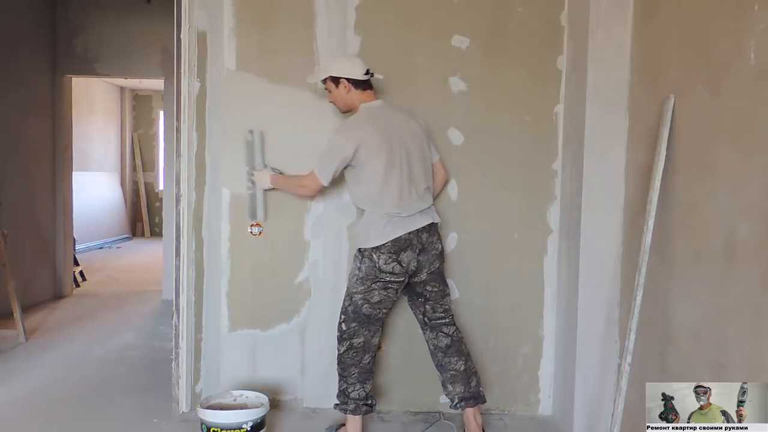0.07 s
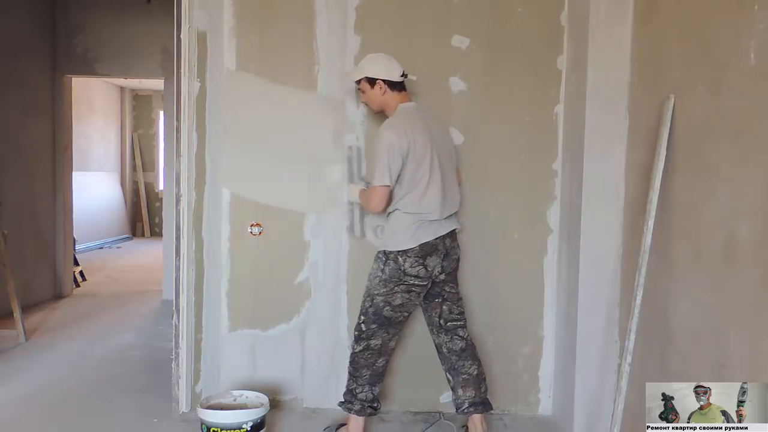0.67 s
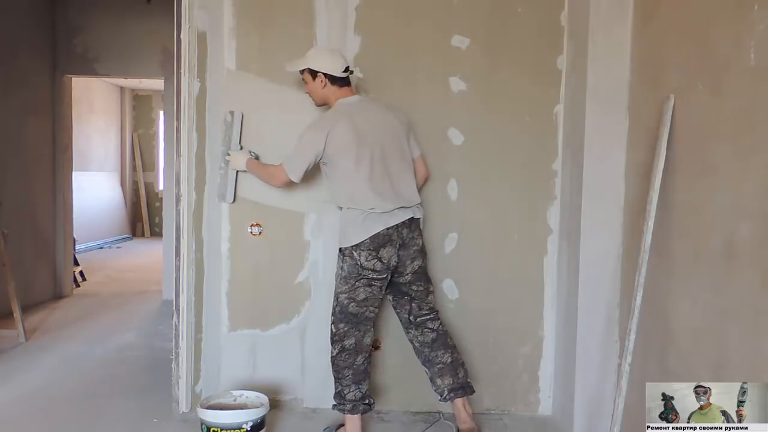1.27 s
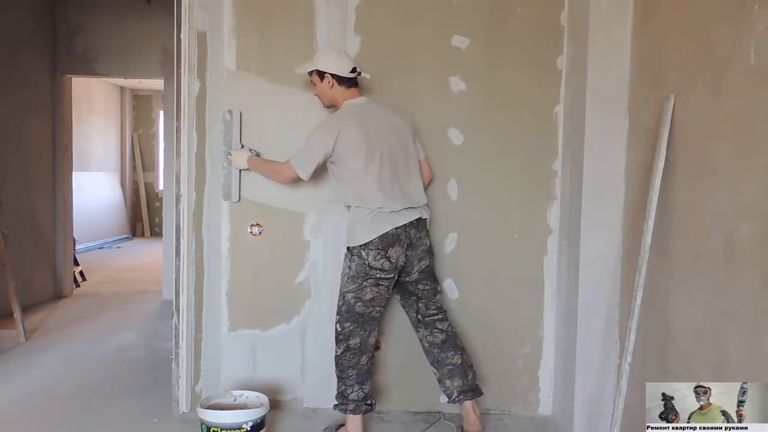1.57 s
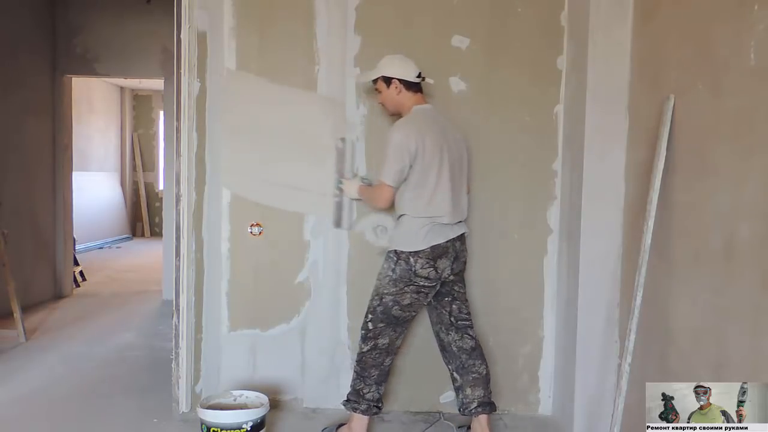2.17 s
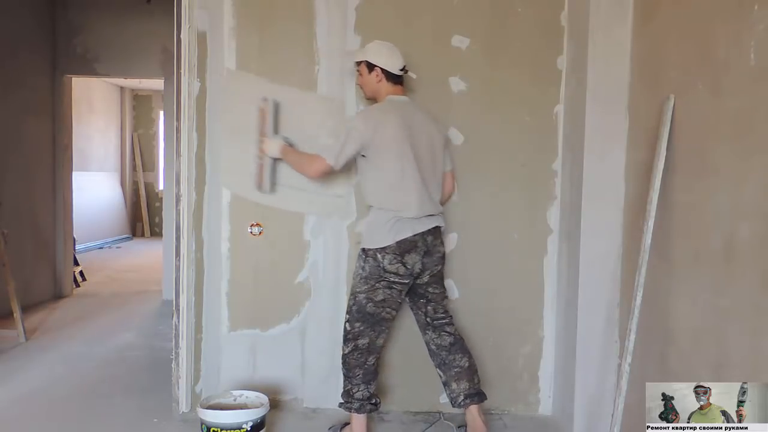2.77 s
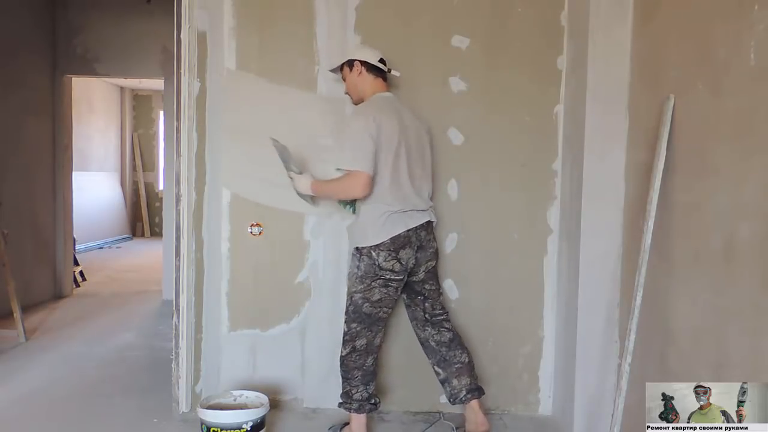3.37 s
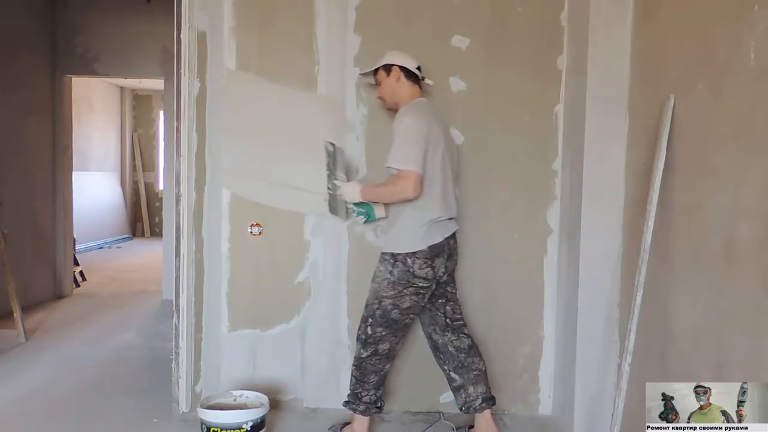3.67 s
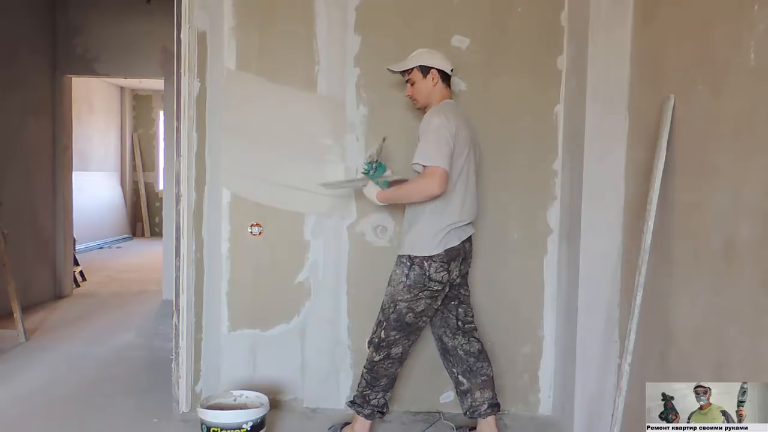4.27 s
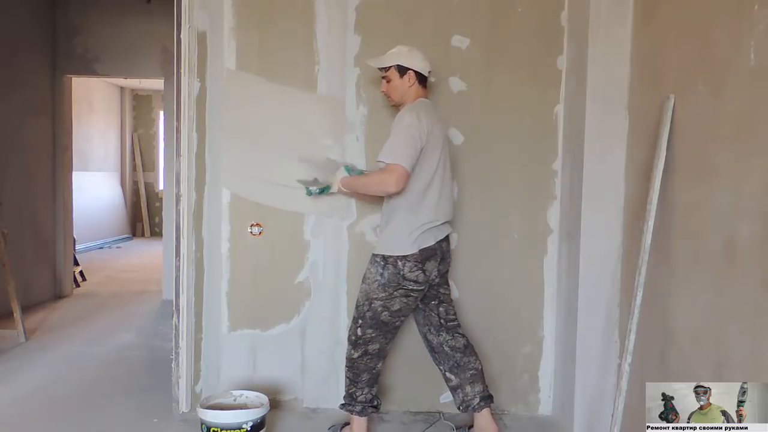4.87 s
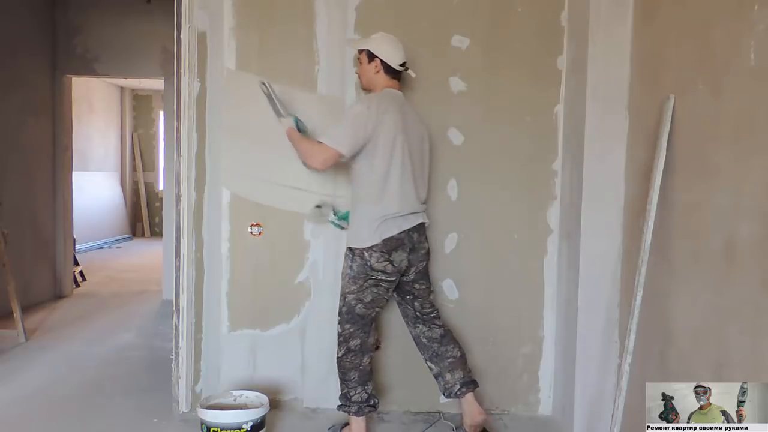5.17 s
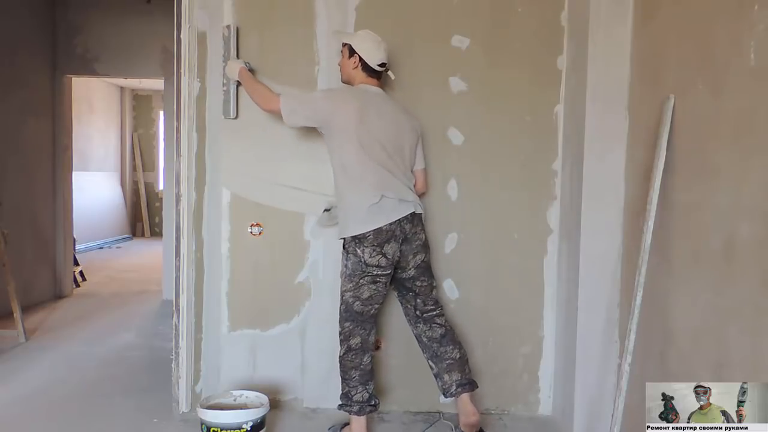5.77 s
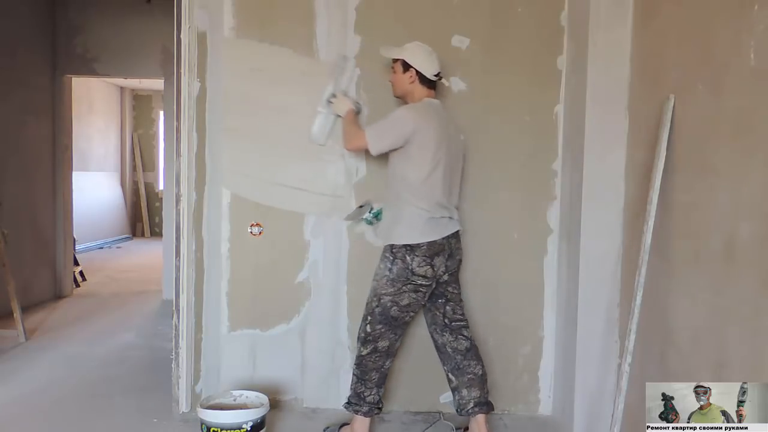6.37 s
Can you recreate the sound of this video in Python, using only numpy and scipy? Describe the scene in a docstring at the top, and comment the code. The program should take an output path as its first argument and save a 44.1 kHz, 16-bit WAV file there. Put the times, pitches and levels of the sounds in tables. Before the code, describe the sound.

Gritty trowel strokes spread hissing wet plaster on a wall in a bare, echoing room, broken by a putty knife wiping the blade.

```python
"""Plastering a wall

A wide steel trowel skims a wall in a bare, echoing room: two long strokes and the start of a third.
Grit grinds under the edge, the blade judders and drums on the wall, wet plaster hisses as it spreads.
In between, a putty knife wipes the blade clean and reloads it, and the trowel is set back
with a soft thud."""
import sys
import numpy as np
from scipy import signal
from scipy.fft import rfft, irfft, next_fast_len
from scipy.io import wavfile
from scipy.ndimage import uniform_filter1d, map_coordinates

SR = 44100
rng = np.random.default_rng(int(sys.argv[2]) if len(sys.argv) > 2 else 0)


def digitize_waveform(pressure):
    """Quantize a signal to 16-bit integers and store it at the path in sys.argv[1].

    Rows of a 2-D input are taken as channels; values are limited to [-1, 1].
    """
    field = np.atleast_2d(pressure).T
    bounded = np.clip(field, -1, 1)
    quanta = np.round(bounded * 32767).astype(np.int16)
    wavfile.write(sys.argv[1], SR, quanta)


N = 292383
T = np.arange(N) / SR


def amp(db):
    """Turn decibels into a number to multiply by."""
    return 10 ** (np.asarray(db) / 20)


def unit(x):
    """Scale a signal to an average strength (rms) of 1."""
    return x / np.sqrt(np.mean(x ** 2) + 1e-20)


def along(points, hz):
    """Read between rows of (frequency, value), giving each octave equal space."""
    freqs, values = np.transpose(points)
    return np.interp(np.log(hz + 1), np.log(freqs + 1), values)


def filtered(x, response):
    """Multiply each frequency in x by response(frequency)."""
    size = x.shape[-1]
    padded = next_fast_len(size + SR // 4)
    hz = np.fft.rfftfreq(padded, 1 / SR)
    return irfft(rfft(x, padded) * response(hz), padded)[..., :size]


def colour(x, spectrum):
    """Shape the tone of x with rows of (frequency in Hz, level in dB)."""
    return filtered(x, lambda hz: amp(along(spectrum, hz)))


def wobble(rate):
    """A smooth curve through `rate` random values a second."""
    return map_coordinates(rng.standard_normal(int(N * rate / SR) + 4), [T * rate])


def swell(start, length, shape=0.51):
    """A rounded rise and fall; a higher shape eases in and out more gently."""
    progress = np.clip((T - start) / length, 0, 1)
    return (4 * progress * (1 - progress)) ** shape


def held(start, length, attack_s, release_s):
    """Contact builds up, holds and lets go."""
    touch = np.clip((T - start) / attack_s, 0, 1) * np.clip((start + length - T) / release_s, 0, 1)
    return np.sin(np.pi / 2 * touch) ** 2


def drift(start, length, db_per_s):
    """A gain that changes steadily during a movement and is 1 at its middle."""
    return amp(db_per_s * (np.clip(T - start, 0, length) - length / 2))


def grit(rate, spread_db):
    """Sand grains catch at random, about `rate` a second, some harder than others."""
    size = amp(spread_db * np.clip(rng.standard_normal(N), -2, 2))
    caught = rng.random(N) < rate / SR
    return unit(caught * size * rng.choice([-1, 1], N))


def shifting(x, depth_db):
    """The contact travels along the edge, so narrow bands of the sound swell and fade."""
    bands = signal.stft(x, nperseg=1024)[2]
    swells = uniform_filter1d(rng.standard_normal(bands.shape), size=4, axis=0)  # smooth across pitch
    swells = uniform_filter1d(swells, size=12, axis=1)  # and across time
    return signal.istft(bands * amp(depth_db * unit(swells)), nperseg=1024)[1][:N]


# The tone of the empty building. Each row: frequency in Hz, level in dB.
AIR_TONE = [(20, -6), (32, 2), (43, -13), (57, 5.5), (72, -7.5), (140, -7), (300, -8.5), (1000, -12.5),
            (3000, -19), (8000, -22.5), (14000, -29)]

def still_air(level_db, side_db):
    """The low murmur of the building; mid is what both ears share, side is how they differ."""
    mid, side = rng.standard_normal((2, N))
    side = amp(side_db) * colour(side, [(60, -4), (200, 1.5), (1000, 5.5), (2500, 7.5)])
    return amp(level_db) * unit(colour(np.array([mid + side, mid - side]), AIR_TONE))


# How long the room rings. Each row: frequency in Hz, seconds to fade by 60 dB.
ROOM_FADE = [(100, 1.2), (300, 1.32), (750, 1.17), (1200, 1.18), (2800, 0.92), (4600, 0.8), (8000, 0.63),
             (13000, 0.48)]

def echoes(early_db, early_fade_s, ear_gap_m):
    """The room's answer to a click, as mid and side: early bounces off the walls and a dense tail."""
    hz, frame_s, bands = signal.stft(rng.standard_normal((2, SR)), SR, nperseg=256)
    fade = amp(-60 * frame_s / along(ROOM_FADE, hz)[:, None])
    tail = signal.istft(bands * fade, SR, nperseg=256)[1][:, :SR]
    t = np.arange(SR) / SR
    bounces = (rng.random(tail.shape) < 1500 / SR) * rng.choice([-1, 1], tail.shape)
    early = unit(bounces * amp(-60 * t / early_fade_s))
    build_up = 1 - np.exp(-t / 0.0025)
    pair = unit(build_up * (unit(tail) + amp(early_db) * early)) / np.sqrt(SR)
    # two close listening points hear long waves alike and short waves unrelated
    alike = lambda hz: np.sinc(2 * hz * ear_gap_m / 343) / (1 + (hz / 3000) ** 2)
    return filtered(pair, lambda hz: np.sqrt(np.array([1 + alike(hz), 1 - alike(hz)]) / 2))


# Sound that arrives straight from the wall, which favours the bass.
# Each row: frequency in Hz, level in dB.
DIRECT_TONE = [(300, 1), (1000, -5), (4000, -6.5)]

def room(x, direct_db, split_hz, spot_count=9):
    """Bare walls return far more than the direct sound; each spot on the blade has its own echoes."""
    def echoed(source):
        answer = echoes(early_db=-7, early_fade_s=0.12, ear_gap_m=0.055)
        return signal.fftconvolve(source[None], answer, axes=1)[:, :N]

    # waves longer than the blade cannot tell its spots apart
    long_waves = filtered(x, lambda hz: split_hz / np.hypot(hz, split_hz))
    short_waves = filtered(x, lambda hz: hz / np.hypot(hz, split_hz))
    shares = np.array([wobble(45) for _ in range(spot_count)])
    shares /= np.linalg.norm(shares, axis=0)
    mid, side = echoed(long_waves) + sum(echoed(share * short_waves) for share in shares)
    mid = mid + amp(direct_db) * colour(x, DIRECT_TONE)
    return np.array([mid + side, mid - side])


# Soft rustles. Each row: start in seconds, length in seconds, level in dB.
ARM_RUSTLES = [(5.12, 0.086, -47), (5.221, 0.066, -39), (5.381, 0.043, -41.5), (5.487, 0.081, -46)]

def rustles():
    """Faint, bright brushing while the arm is raised."""
    bright = [(150, -4), (600, -11), (3500, 3), (5500, 6.5), (8500, 4.0), (14000, -3)]
    brush = unit(colour(grit(rate=1500, spread_db=8.0), bright))
    return brush * sum(amp(db) * swell(start, length, shape=0.9) for start, length, db in ARM_RUSTLES)


# How wet plaster muffles whatever rings under it. Each row: frequency in Hz, level in dB.
PLASTER_DAMPING = [(50, -1.5), (130, -8), (600, 10), (1400, 5), (4000, 7), (14000, -26)]

def ring(x, notes):
    """x shakes a plaster-coated body that rings at its own notes; a wider note dies away sooner."""
    def body(hz):
        return sum((-1) ** k * amp(db) * 1j * hz * width / (pitch ** 2 - hz ** 2 + 1j * hz * width)
                   for k, (pitch, width, db) in enumerate(notes))

    return colour(filtered(x, body), PLASTER_DAMPING)


# Brief squeaks. Each row: start in seconds, length in seconds, pitch in Hz, level in dB.
EDGE_SQUEAKS = [(6.053, 0.12, 884, -30), (6.083, 0.072, 540, -30.5)]

def squeaks():
    """The dry edge sticks and slips unevenly near one note of the blade, and sings roughly."""
    out = np.zeros(N)
    for start, length, hz, db in EDGE_SQUEAKS:
        pitch = hz * (1 + 0.045 * wobble(180))
        tone = unit(np.sin(2 * np.pi * np.cumsum(pitch) / SR) * amp(4 * wobble(80)))
        rasp = unit(ring(grit(rate=900, spread_db=-1), [(hz, 70, 0)]))
        out += amp(db) * swell(start, length) * unit(tone + rasp)
    return out


# The notes of the steel blade, first free, then under a fresh lump of plaster.
# Each row: pitch in Hz, width in Hz, level in dB.
FREE_BLADE_NOTES = [(275, 370, -9), (530, 160, -2.5), (703, 140, 0.5), (875, 77, 4.5), (1000, 95, 6),
                    (1800, 480, 0)]
LOADED_BLADE_NOTES = [(270, 160, -27), (483, 140, -2), (590, 81, 0.5), (746, 84, -1), (923, 100, 2),
                      (1600, 1300, -5.5)]
RELOAD_S = 4.4  # when the fresh lump goes on
# The hiss of wet plaster and the fizz of a thin film of it. Each row: frequency in Hz, level in dB.
SMEAR_TONE = [(200, -48), (900, -17), (1600, -6.5), (2100, -3.5), (2700, -1.5), (4100, -4), (5200, -2.5),
              (7000, -4.5), (8500, -4.5), (11000, -10.5), (14000, -17)]
FIZZ_TONE = [(1500, -24.5), (4000, -3.5), (7500, 0), (10000, -2), (14000, -7)]
# The putty knife wipes along the blade. Each row: start in seconds, length in seconds,
# then the levels in dB of steel rub, wet smear and fizz.
KNIFE_WIPES = [(3.374, 0.22, -54, -28, -36), (3.55, 0.18, -36, -30, -33), (3.66, .25, -44, -24.5, -27.5),
               (3.864, .22, -42.5, -32.5, -28.5), (4.474, .165, -35, -31, -51),
               (4.579, 0.23, -39, -34.5, -27.5), (4.849, .17, -42, -40, -31.5)]

def wipes():
    """The knife squeezes plaster along the steel; each wipe starts wet and ends on a fizzing film."""
    rub, smear, fizz = np.zeros((3, N))
    for start, length, rub_db, smear_db, fizz_db in KNIFE_WIPES:
        touch = held(start, length, attack_s=0.065, release_s=0.054)
        rub += amp(rub_db) * touch
        smear += amp(smear_db) * touch * drift(start, length, db_per_s=-11)
        fizz += amp(fizz_db) * touch * drift(start, length, db_per_s=8)
    slips = amp(2.4 * wobble(90))
    catches = grit(rate=700, spread_db=7.0) * slips
    free = unit(ring(catches, FREE_BLADE_NOTES))
    loaded = unit(ring(catches, LOADED_BLADE_NOTES))
    steel = np.where(T < RELOAD_S, free, loaded)
    paste = unit(colour(shifting(grit(rate=6000, spread_db=4.0) * slips, depth_db=2.2), SMEAR_TONE))
    film = unit(colour(grit(rate=4000, spread_db=11.5) * slips, FIZZ_TONE))
    return rub * steel + smear * paste + fizz * film


# The notes of blade and wall shaking together. Each row: pitch in Hz, width in Hz, level in dB.
WALL_NOTES = [(140, 16, -31), (208.6, 45, -6.5), (255, 57, -5.5), (315.6, 60, -3), (441, 68, -5),
              (557, 59, -10)]
# The blade meets the wall or the knife. Each row: time in seconds,
# then the levels in dB of wall thud, steel clack and wet tick.
BLADE_KNOCKS = [(.52, -18.5, -25, -45), (1.248, -17, -36, -42), (1.32, -21, -36, -38),
                (2.426, -20, -23, -38), (3.579, -35, -17.5, -10), (4.497, -46, -23, -25.5),
                (4.517, -22, -19, -15), (5.691, -13.5, -40, -44), (5.722, -14.5, -33, -48),
                (6.559, -24, -27, -36)]

def knocks():
    """Each knock is a short push into wall and blade, with a spit of wet plaster."""
    out = np.zeros(N + SR)
    t = np.arange(SR // 4) / SR
    lead = SR // 100  # samples before the hit
    push = signal.unit_impulse(len(t), lead)
    sized = lambda x: x / np.linalg.norm(x) * np.sqrt(SR / 1000)  # gives each part the same energy
    # soft plaster takes the blow in one broad pulse
    cushion = sized(ring(push, [(178, 144, 4.5), (307, 210, 1.5), (564, 250, -6.0)]))
    thud = sized(sized(ring(push, WALL_NOTES)) + amp(3.5) * cushion)
    for start, thud_db, clack_db, tick_db in BLADE_KNOCKS:
        clack = sized(ring(push, FREE_BLADE_NOTES if start < RELOAD_S else LOADED_BLADE_NOTES))
        burst = rng.standard_normal(len(t)) * amp(-60 * t / 0.021)
        tick = sized(colour(np.roll(burst, lead), SMEAR_TONE))
        knock = amp(thud_db) * thud + amp(clack_db) * clack + amp(tick_db) * tick
        out[round(start * SR) - lead:][:len(t)] += knock
    return out[:N]


# The edge bumps over ridges. Each row: start in seconds, length in seconds, level in dB.
RIDGE_BUMPS = [(0.137, 0.13, -42), (0.248, 0.059, -33), (1.947, 0.099, -40), (2.44, 0.042, -43),
               (6.248, 0.113, -40.5)]

def ridges():
    """Slow, heavy slips make the wall boom at its lowest notes."""
    boom = unit(ring(grit(rate=380, spread_db=-0.5), [(136, 65, 4), (188, 45, 2.5)]))
    return boom * sum(amp(db) * swell(start, length) for start, length, db in RIDGE_BUMPS)


# The notes of the bent blade. Each row: pitch in Hz, width in Hz, level in dB.
BENT_BLADE_NOTES = [(270, 38, 1.5), (703, 113, -2), (870, 150, -3), (1110, 250, 1.5), (1324, 95, 1)]
# The hand leans in. Each row: start in seconds, length in seconds, extra grinding in dB,
# extra smear in dB, level of the steel's roar in dB.
HAND_PUSHES = [(0.067, 0.1, 6, 8, -40), (0.138, 0.11, 2, 3.5, -26), (0.238, 0.077, 10, 8.5, -24.5),
               (0.607, 0.14, 5.5, 10, -26), (1.636, 0.032, 5, -4, -26), (2.315, .1, 4, 6, -20.5),
               (2.426, 0.047, 7, 6.5, -14), (6.231, 0.15, 6, 6.5, -28), (6.557, 0.045, 2.5, 8.5, -37)]

def bites():
    """Under extra pressure the edge chatters and the bent steel roars."""
    chatter = grit(rate=1500, spread_db=2.0) * amp(3.2 * wobble(170))
    roar = unit(ring(chatter, BENT_BLADE_NOTES))
    return roar * sum(amp(db) * swell(start, length) for start, length, _, _, db in HAND_PUSHES)


# The trowel is pulled along on its edge. Each row: start in seconds, length in seconds,
# pressure in dB, its change in dB per second, judder in dB compared with the pressure.
TROWEL_STROKES = [(-.02, 0.77, -26.5, 2, -7), (1.596, 0.87, -24.5, 5, -12.5), (6.03, .635, -27, 1.5, -12)]
# The blade glides almost flat on the wet coat. Each row: start in seconds, length in seconds,
# then the levels in dB of grinding, wet smear and fizz.
LIGHT_GLIDES = [(1.141, 0.14, -50.5, -35, -39), (1.232, .22, -42, -27, -37), (1.538, 0.14, -46, -28, -44),
                (2.97, .11, -58, -50, -42), (3.022, 0.1, -40.5, -31, -40), (3.092, 0.17, -47, -25.5, -34.5),
                (5.692, 0.18, -48, -43.5, -42), (5.814, 0.26, -41, -44.5, -41.5)]
# Set down on the wall, the blade shudders until it lies flat.
# Each row: start in seconds, length in seconds, level in dB.
LANDING_SHUDDERS = [(1.242, 0.056, -29.5), (1.3, .09, -39), (5.735, 0.084, -39)]

def trowel_contact():
    """Pressure sets the strength of judder, grinding and smear; light glides leave a fizzing film."""
    dig_db = sum(db * swell(start, length, shape=0.75) for start, length, db, _, _ in HAND_PUSHES)
    squeeze_db = sum(db * swell(start, length, shape=0.89) for start, length, _, db, _ in HAND_PUSHES)
    release_s, trail_db, trail_fade_db_per_s = 0.022, -8.5, 34
    judder, grinding, smear, fizz = np.zeros((4, N))
    for start, length, db, db_per_s, judder_db in TROWEL_STROKES:
        pressure = amp(db) * drift(start, length, db_per_s)
        edge = pressure * held(start, length, attack_s=0.047, release_s=release_s)
        # after a stroke the lifting edge still grazes grit and plaster
        lifted_s = T - (start + length - release_s)
        trail = pressure * (lifted_s > 0) * amp(trail_db - trail_fade_db_per_s * np.abs(lifted_s))
        judder += edge * amp(judder_db + 0.5 * dig_db)
        grinding += edge * amp(dig_db - 0.13) + trail
        smear += edge * amp(squeeze_db + 0.3) + amp(-14) * trail
    for start, length, grind_db, smear_db, fizz_db in LIGHT_GLIDES:
        touch = swell(start, length, shape=0.76)
        grinding = np.hypot(grinding, amp(grind_db) * touch)
        smear = np.hypot(smear, amp(smear_db) * touch)
        fizz = np.hypot(fizz, amp(fizz_db) * touch)
    judder += sum(amp(db) * swell(start, length) for start, length, db in LANDING_SHUDDERS)
    return judder, grinding, smear, fizz


# Dry grit grinding under the edge. Each row: frequency in Hz, level in dB.
GRIND_TONE = [(90, -34), (200, -19), (300, -14), (570, -8.5), (760, 1), (900, -2), (1150, -4.5), (1600, -4),
              (2200, -11), (2900, -7.5), (4200, -17), (8000, -29.5), (14000, -24)]

def strokes():
    """The edge advances in small uneven slips that bunch the grains and shake the wall."""
    judder, grinding, smear, fizz = trowel_contact()
    slips = amp(3.6 * wobble(130) + 0.11 * wobble(25))
    drum = unit(ring(grit(rate=500, spread_db=6.0) * slips, WALL_NOTES))
    sand = unit(colour(shifting(grit(rate=3200, spread_db=4.5) * slips, depth_db=2.5), GRIND_TONE))
    paste = unit(colour(shifting(grit(rate=5000, spread_db=3.0) * slips, depth_db=1.2), SMEAR_TONE))
    film = unit(colour(grit(rate=5000, spread_db=7.5) * slips, FIZZ_TONE))
    return judder * drum + grinding * sand + smear * paste + fizz * film


def scene():
    """All the work echoes in the same room, over the murmur of the building."""
    work = strokes() + bites() + ridges() + wipes() + knocks() + squeaks() + rustles()
    return amp(-0.98) * room(work, direct_db=-2.0, split_hz=437) + still_air(level_db=-49, side_db=-7.5)


# How the sound leans to one side. Each row: frequency in Hz, left level minus right level in dB.
LEFT_RIGHT_BALANCE = [(100, 0), (400, -0.7), (1000, -0.5), (2000, -0.8), (4000, -2), (8000, -2),
                      (12000, 1.3)]

def record(dry):
    """Left and right get a slightly different tone, and the highest treble is cut off."""
    top_hz = 14350
    lean = lambda hz: amp(np.outer([0.5, -0.5], along(LEFT_RIGHT_BALANCE, hz)))
    return filtered(dry, lambda hz: lean(hz) * (hz < top_hz))


dry = scene()
out = record(dry)
digitize_waveform(out)
```